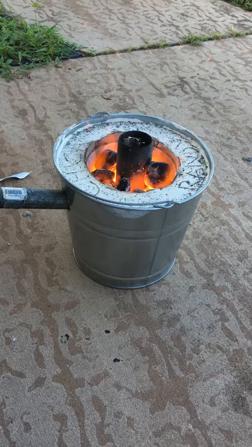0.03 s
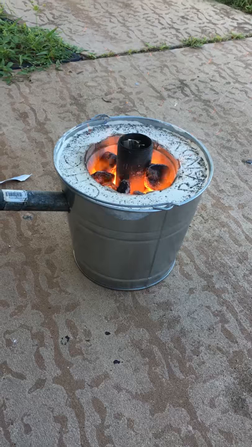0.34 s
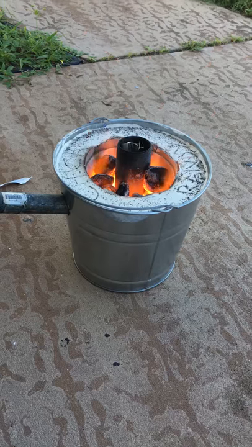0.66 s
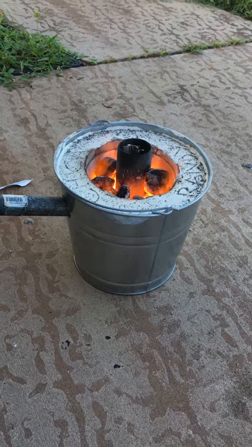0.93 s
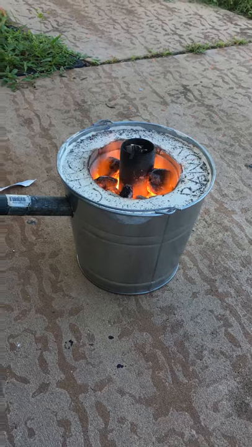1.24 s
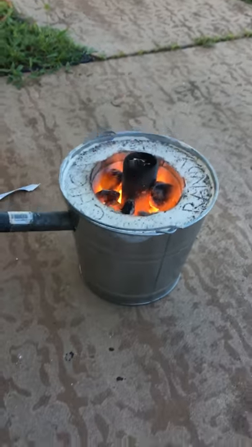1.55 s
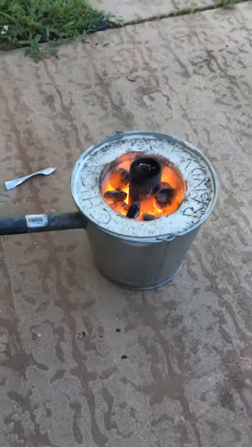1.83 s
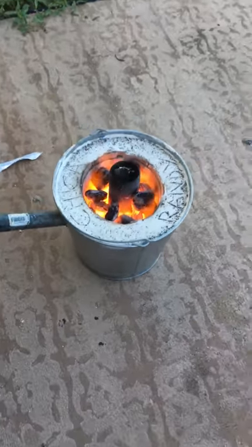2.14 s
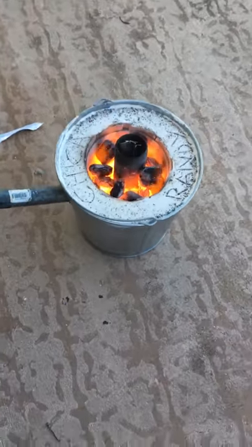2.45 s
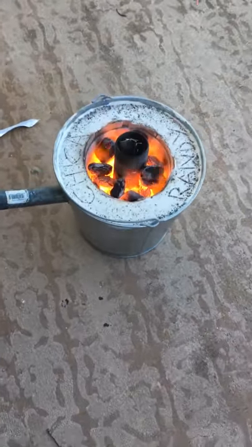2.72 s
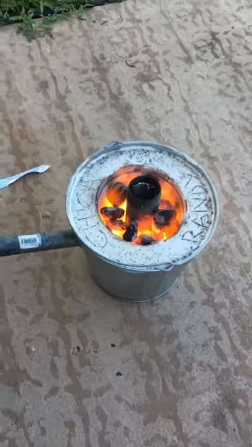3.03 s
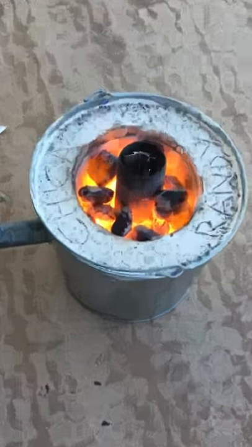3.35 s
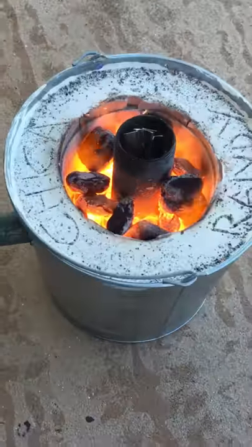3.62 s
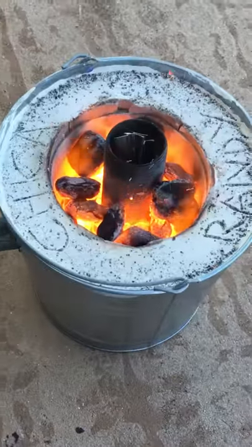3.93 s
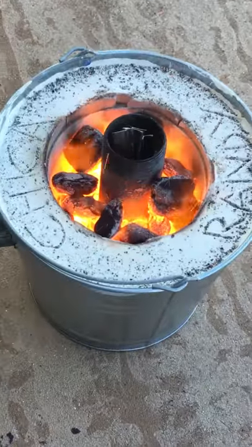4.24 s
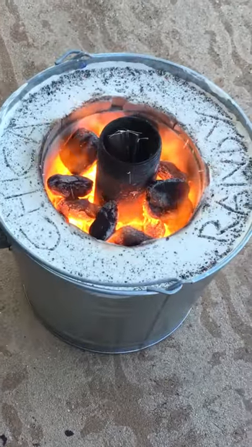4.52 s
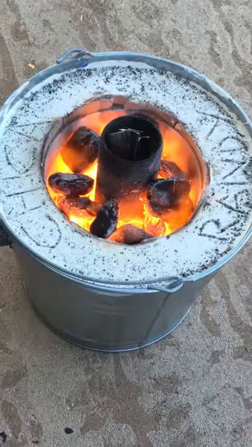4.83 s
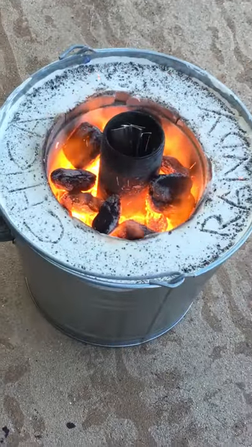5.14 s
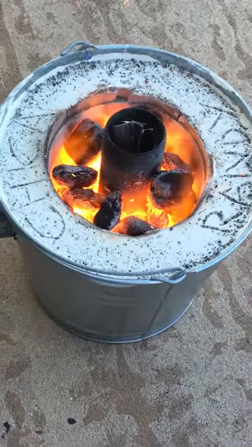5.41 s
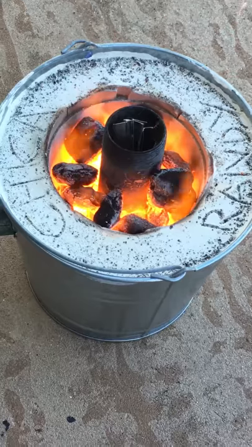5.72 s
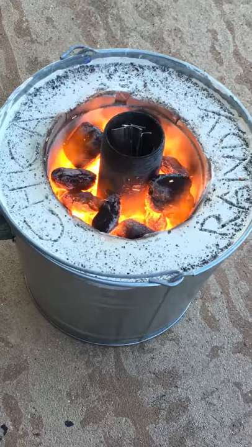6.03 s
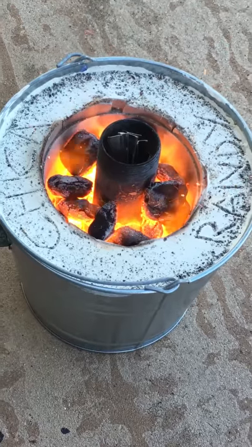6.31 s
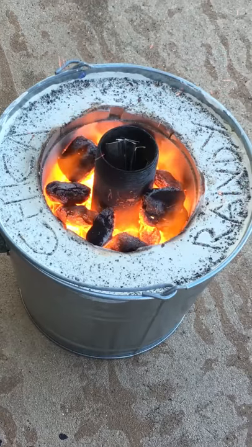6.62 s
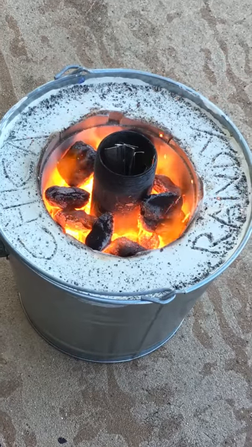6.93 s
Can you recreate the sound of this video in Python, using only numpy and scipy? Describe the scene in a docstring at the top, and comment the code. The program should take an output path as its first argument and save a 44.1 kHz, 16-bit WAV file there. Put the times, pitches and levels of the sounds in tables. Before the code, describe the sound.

A loud electric blower whines steadily over rushing air as it feeds a small charcoal furnace outdoors.

```python
"""Blower on a charcoal furnace

Outdoors on concrete, an electric blower feeds a furnace in a steel bucket through a pipe. Its
eight-blade impeller whines over the hum of the shaft; air rushes through housing and pipe and
roars in the coals. Close up, a hand-held phone moves from beside the bucket to above its mouth.
The hand bumps the phone early on, and an ember snaps once."""
import sys
import numpy as np
from scipy import signal
from scipy.fft import rfft, irfft
from scipy.io import wavfile

SR = 44100
rng = np.random.default_rng(int(sys.argv[2]) if len(sys.argv) > 2 else 0)


def dump_mix(stems):
    """Bounce the given channels to the path in sys.argv[1] as a 16-bit WAV at rate SR."""
    frames = np.atleast_2d(stems).T  # one column per channel
    limited = np.clip(frames, -1, 1)  # hard clip at full scale
    pcm = np.round(limited * 32767).astype(np.int16)
    wavfile.write(sys.argv[1], SR, pcm)


N = 316197
TIME = np.arange(N) / SR
FREQS = np.fft.rfftfreq(N, 1 / SR)


def undb(db):
    """Decibels to gain."""
    return 10 ** (np.asarray(db) / 20)


def curves(table):
    """Each column of a timed table, joined by straight lines."""
    times, *columns = np.transpose(table)
    return [np.interp(TIME, times, column) for column in columns]


def noise(spectrum):
    """Noise of rms 1 with the given spectral shape."""
    shaped = irfft(rfft(rng.standard_normal(N)) * spectrum, N)
    return shaped / shaped.std()


def band(hz, width_hz):
    """Noise in one resonance."""
    return noise(1 / (1 + (2 * (FREQS - hz) / width_hz) ** 2))


def wander(rate_hz):
    """Smooth random drift of rms 1."""
    return noise(1 / (1 + (FREQS / rate_hz) ** 4))


def swell(at_s, length_s):
    """A smooth rise and fall around one moment."""
    return np.exp(-((TIME - at_s) / length_s) ** 2)


# Microphone path, 0 beside the bucket to 1 above its mouth: (time [s], position [0..1])
MIC_PATH = [(0, 0), (1.3, 0.11), (1.7, .45), (2.2, 0.83), (3.5, 1), (7.17, 0.84)]

def mic_position():
    """How far the hand has carried the microphone from the bucket's side to its mouth."""
    return np.clip(curves(MIC_PATH)[0], 0, 1)


# The blower runs nearly steady: (time [s], shaft speed [turns/s])
SHAFT_SPEED = [(0.15, 341.3), (1.8, 341.15), (2.6, 341.5), (3.2, 341.0), (4.5, 340.73), (6.1, 341.28),
               (7.1, 340.85)]

def shaft_turns(skip_s=5.574, skip_turns=.05):
    """Rotor angle in turns; the speed trembles a little, and the tones skip once in phase."""
    speed = curves(SHAFT_SPEED)[0] + .04 * wander(9)
    return np.cumsum(speed) / SR + skip_turns * (TIME >= skip_s)


# Impeller tones, close up: (multiple of the blade rate, base level [dB], hand sway [dB rms])
BLADE_TONES = [(1, -23.5, 0.24), (2, -21, 0.68), (3, -42.5, 1), (4, -42, 0.6)]
# The microphone crosses the standing waves of the two strongest tones, then settles:
# (time [s], blade tone gain [dB], octave gain [dB])
STANDING_WAVES = [(0.1, 1.1, -6), (0.85, .4, -2), (1.38, .2, -2.5), (1.51, 0, -9.5), (1.69, 3.3, 3.5),
                  (1.93, -3, -3), (2.28, .6, 3), (2.6, .1, -1.5), (2.95, 0.5, 1), (3.8, .2, -0.6),
                  (4.45, -0.3, 1), (7.1, -2.3, 1)]
# Two thin overtones trade places: (time [s], third harmonic gain [dB], fourth harmonic gain [dB])
OVERTONE_GAINS = [(0.1, -4, 1.5), (0.7, -4.5, -1), (1.4, -9, 1), (1.9, 3, -2.5), (2.25, -2, -5),
                  (2.8, -1, 2.5), (4.2, 2.5, -3), (6.2, -1.5, .5), (7.17, 1, 1)]

def impeller_whine(turns, blades=8, sway_hz=4.3, shimmer=.055, roughness=.029, ripple=.03):
    """Blade-passing tone and three overtones; intake turbulence shakes their strength and phase."""
    whine = 0
    drifts_db = curves(STANDING_WAVES) + curves(OVERTONE_GAINS)
    for (multiple, level_db, sway_db), drift_db in zip(BLADE_TONES, drifts_db):
        gain = undb(level_db + drift_db + sway_db * wander(sway_hz))
        flutter = 1 + shimmer * wander(28) + roughness * wander(160) + ripple * band(122, 40)
        phase = 2 * np.pi * round(multiple) * blades * turns + roughness * wander(210)
        whine += np.sqrt(2) * gain * flutter * np.sin(phase)
    return whine


# Rotor hum at both microphone positions:
# (multiple of the shaft rate, level beside the bucket [dB], level above it [dB])
SHAFT_HARMONICS = [(1, -35, -38.5), (2, -53, -47.5), (3, -43.5, -46), (4, -45, -44), (5, -39, -45.5),
                   (6, -42.5, -42), (7, -53, -55), (9, -44.5, -45.5), (10, -47, -67), (12, -47, -44.5),
                   (17, -50, -53), (20, -58, -55), (28, -44.5, -50), (36, -50, -61), (40, -56, -61),
                   (44, -63, -61)]

def rotor_hum(turns, above, waver_db=.87):
    """The slightly unbalanced rotor hums in harmonics of the shaft, each wavering on its own."""
    hum = 0
    for multiple, beside_db, above_db in SHAFT_HARMONICS:
        level_db = beside_db + above * (above_db - beside_db) + waver_db * wander(5.2)
        phase = 2 * np.pi * (round(multiple) * turns + rng.random())
        hum += np.sqrt(2) * undb(level_db) * np.sin(phase)
    return hum


# Motor and housing, the same at both positions: (frequency [Hz], level [dB])
MOTOR_TONES = [(76.5, -60), (153, -50), (307, -59), (3290, -54), (3531, -42), (4802, -51), (5090, -50),
               (5333, -42), (5578, -44)]

def motor_tones():
    """Motor and housing ring faintly at fixed pitches, each a narrow band of noise."""
    return sum(undb(db) * band(hz, 3 + hz / 300) for hz, db in MOTOR_TONES)


# Base spectrum of the air: (frequency [Hz], density beside the bucket [dB/Hz], above it [dB/Hz])
AIR_SPECTRUM = [(20, -84.7, -90), (35, -84, -79), (55, -64, -65), (75.4, -59, -60.5), (292, -58.5, -62.5),
                (538, -62.5, -56), (1000, -59, -60.5), (2000, -61.5, -62), (4300, -63, -63.0),
                (4550, -68, -66.5), (5950, -63, -63.5), (7270, -72.0, -71.5), (11200, -71, -73.0),
                (15500, -77, -79.5)]
# Resonances and notches of furnace, pipe and housing:
# (frequency [Hz], width [Hz], gain beside the bucket [dB], gain above it [dB])
DUCT_RESONANCES = [(344, 110, -4, -1), (394, 34, 1.5, 3), (568, 95, 6, 3.5), (626, 31, 0, -2.5),
                   (708, 79, 4.5, 2), (1204, 105, -3, 2.5), (1337, 76, 0, -10), (1436, 120, -8, 0.2),
                   (2215, 110, -2, 4.5), (2530, 80, 0, -3.5), (3000, 130, -5.5, -3), (3650, 240, 3.5, 2),
                   (5440, 310, 6.5, 5.5), (6150, 140, 2, 0.5), (6370, 300, -1, -1), (8600, 1040, 3, 2.5),
                   (9600, 300, 4, 0), (10330, 400, -0.5, -2.5), (10840, 250, 3, 0.5)]
# The hiss beams, so it changes as the microphone turns: (time [s], gain [dB])
HISS_BEAM = [(0.1, 0), (0.3, 1.5), (0.62, -4.5), (1.0, -1.5), (1.35, 0.5), (1.9, -1), (2.9, .5), (4.2, .5),
             (6.4, -0.4), (7.17, -1)]
# The hiss dips briefly: (time [s], gain [dB])
HISS_DIPS = [(2.29, -1.5), (4.59, -3)]

def rushing_air(above, flame_hz=900, hiss_hz=6300, flame_db=1, gust_db=.47, dip_s=.043):
    """Turbulence coloured by the ducts; its low part flutters in the flames, its high part hisses."""
    hz = np.maximum(FREQS, 1)
    turbulence = rfft(rng.standard_normal(N)) * np.sqrt(SR / 2)  # unit power per Hz
    flame_share = 1 / (1 + (hz / flame_hz) ** 4)
    flame_gain = undb(flame_db * wander(15))
    hiss_share = 1 / (1 + (hiss_hz / hz) ** 8)
    dips_db = sum(db * swell(at_s, dip_s) for at_s, db in HISS_DIPS)
    hiss_gain = undb(curves(HISS_BEAM)[0] + dips_db)
    points_hz, *spectra_db = np.transpose(AIR_SPECTRUM)
    centres, widths, *resonances_db = np.transpose(DUCT_RESONANCES)
    bells = np.exp(-2 * ((hz[:, None] - centres) / widths) ** 2)
    air = 0
    # crossfade from beside the bucket to above it
    for weight, spectrum_db, peaks_db in zip((1 - above, above), spectra_db, resonances_db):
        base_db = np.interp(np.log(hz), np.log(points_hz), spectrum_db)
        flow = turbulence * undb(base_db + bells @ peaks_db)
        roar = irfft(flow * flame_share, N)
        hiss = irfft(flow * hiss_share, N)
        rush = irfft(flow, N) - roar - hiss
        air += weight * (flame_gain * roar + rush + hiss_gain * hiss)
    return air * undb(gust_db * wander(10.6))


def hand_bump(at_s=.635, hz=62, length_s=.015, gain_db=-25):
    """Handling noise: a soft low thud of the hand on the phone."""
    return undb(gain_db) * swell(at_s, length_s) * np.sin(2 * np.pi * hz * (TIME - at_s))


# One snap in the coals, below the microphone: (time [s], level [dB])
EMBER_CRACKS = [(2.953, -16), (2.955, -16), (2.956, -18)]

def ember_snap(decay_s=.0007):
    """A coal splits in a quick run of bright cracks."""
    envelope = 0
    for at_s, level_db in EMBER_CRACKS:
        envelope += undb(level_db) * (TIME >= at_s) * np.exp(-np.abs(TIME - at_s) / decay_s)
    return envelope * band(9500, 9000)


def scene():
    """Blower, furnace and hand at one moving microphone, the same in both channels."""
    above = mic_position()
    turns = shaft_turns()
    blower = impeller_whine(turns) + rotor_hum(turns, above) + motor_tones()
    mono = blower + rushing_air(above) + hand_bump() + ember_snap()
    return np.array([mono, mono])


def record(dry, open_s=.084, cutoff_hz=15750):
    """The phone opens its microphone after a moment and cuts the highest treble."""
    fade_in = np.clip((TIME - open_s) / .001, 0, 1)
    lowpass = signal.ellip(12, .1, 90, cutoff_hz, fs=SR, output="sos")
    return signal.sosfilt(lowpass, dry * fade_in)


dry = scene()
out = record(dry)
dump_mix(out)
```